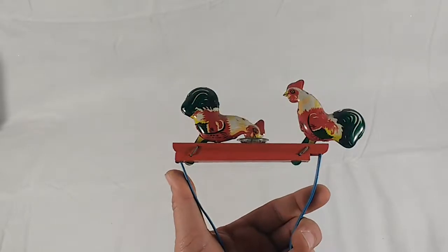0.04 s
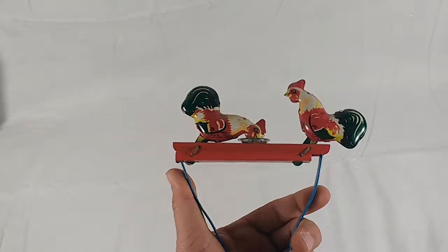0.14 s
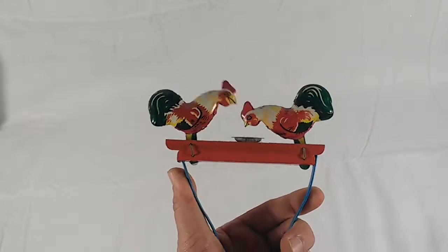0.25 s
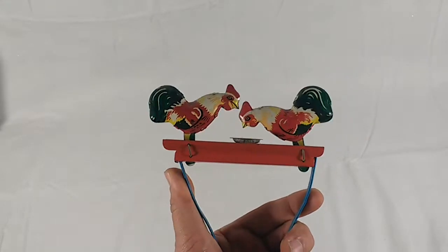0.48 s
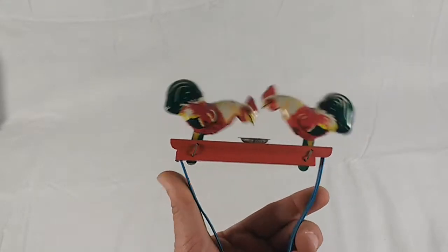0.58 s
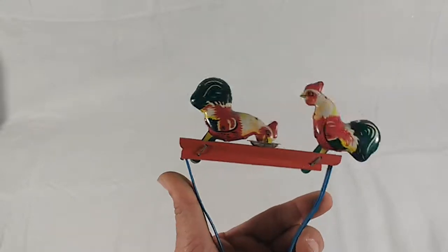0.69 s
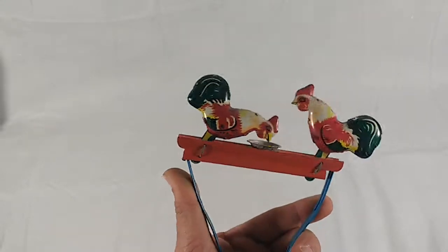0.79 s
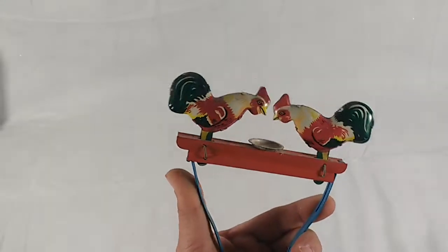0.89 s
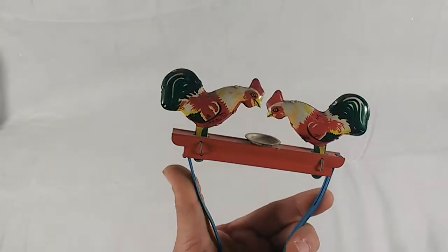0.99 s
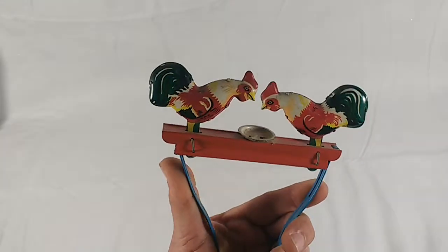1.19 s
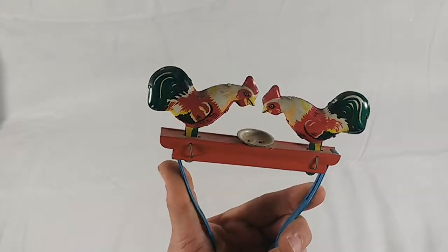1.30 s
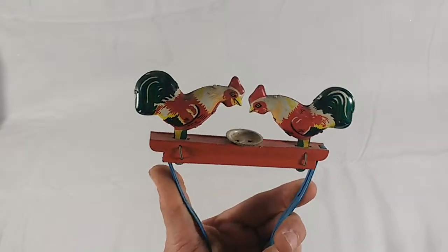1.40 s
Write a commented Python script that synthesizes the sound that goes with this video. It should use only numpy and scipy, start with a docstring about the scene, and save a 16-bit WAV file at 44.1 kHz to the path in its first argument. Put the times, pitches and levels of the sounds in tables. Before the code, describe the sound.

Sharp, dry clicks come from a hand-squeezed tin toy, its hens pecking in turn with a brief thin ring. Two clattering bursts and a smaller tap are heard up close, leaving only a small room's faint hiss and hum.

```python
"""Hiss, rumble and mains hum fill a small quiet room. At 0.12 s the wire linkage of a hand-held toy scrapes
and the squeezing hand rustles. Two tin hens rock on pivots and peck at a dish, each stroke a cluster of
tiny metal contacts that ring the thin pressed sheet: right hen from 0.21 s, left from 0.58 s, right again
at 0.79 s, a last faint tick of the left at 1.26 s. Both hens share one stereo image, the left channel
a late, inverted twin of the right."""
import sys
import numpy as np
from scipy import signal
from scipy.fft import rfft, irfft, next_fast_len
from scipy.io import wavfile
from scipy.ndimage import uniform_filter1d

SR = 44100
rng = np.random.default_rng(int(sys.argv[2]) if len(sys.argv) > 2 else 0)


def dump(signal):
    """Clip the signal to [-1, 1] and save it as 16-bit WAV at the path in sys.argv[1]."""
    limited = np.clip(np.atleast_2d(signal).T, -1, 1)
    pcm = np.round(limited * 32767).astype(np.int16)
    wavfile.write(sys.argv[1], SR, pcm)


N = 63945

# metal contacts (time [s], hen, knock gain [dB], body gain [dB], treble gain [dB])
CONTACTS = [(0.207, "right", -30.5, -37.5, -48), (0.218, "right", -58, -39, -47),
            (0.2236, "right", -19, -29.5, -32), (0.2278, "right", -17, -32.5, -33),
            (0.2333, "right", -32, -34, -33.5), (0.2677, "right", -42, -28, -36),
            (0.2713, "right", -35, -51, -37), (0.2747, "right", -29, -22.5, -17.5),
            (.2808, "right", -15.5, -26.5, -24), (0.2923, "right", -23, -33, -32.5),
            (0.303, "right", -40, -38, -39), (.3200, "right", -46, -45, -53),
            (0.33, "right", -36, -41.5, -56), (0.385, "right", -61, -46.5, -64),
            (0.5791, "left", -48, -52, -89), (0.5872, "left", -32, -29, -33.5),
            (0.5898, "left", -25.5, -35.5, -30), (0.6073, "left", -46, -39.5, -45),
            (0.6164, "left", -35, -45.5, -60), (.6705, "left", -22, -34.5, -25.5),
            (0.6736, "left", -16, -24.5, -26), (0.6817, "left", -23, -27, -37),
            (0.719, "left", -54, -49.5, -68), (0.7857, "left", -58, -45, -53.5),
            (0.7878, "right", -34.5, -35, -47), (.7910, "right", -22.5, -46, -46),
            (0.8006, "right", -50, -43, -57), (1.2608, "left", -58, -54.5, -59.5)]
# ringing modes per hen (frequency [Hz], relative level [dB], t60 [s])
HEN_MODES = {"right": [(1292, -24.5, 0.16), (1441, -14.5, 0.06), (2280, -15.5, 0.09), (2700, -6.5, 0.091),
             (2817, -7.5, 0.049), (3072, -8.5, 0.092), (3235, -17, 0.15), (3804, -9.5, 0.029),
             (4065, -12, 0.064), (4810, -15.5, 0.079), (6000, -21, 0.084), (6590, -16.5, 0.071),
             (7820, -6, 0.022), (8120, -13, 0.055), (10230, -38, 0.044)], "left": [(440, -29.5, 0.049),
             (1131, -21, 0.03), (1301, -16.5, 0.08), (1380, -15.5, .04), (2400, -9, 0.03),
             (2710, -12.5, 0.048), (2888, -5, 0.047), (3130, -20, 0.035), (3640, -6, 0.037),
             (3920, -4.5, 0.044), (4720, -18, 0.042), (6600, -4, 0.046), (9790, -20.5, 0.1),
             (11810, -13, 0.048), (11900, -21, .05)]}
# crowded short-lived sheet modes, body and treble (frequency [Hz], relative density [dB])
BODY_SPECTRUM = [(150, -34), (420, -24), (850, -29), (1200, -15), (1600, -6), (2300, -2), (2850, 1),
                 (3400, -4.5), (4200, -6.5), (5500, -20.5), (16000, -37)]
TREBLE_SPECTRUM = [(300, -57), (1000, -20.5), (2500, -3), (4500, -2), (5400, -7.5), (6500, 2), (8000, -1),
                   (9000, -1), (12300, -5.5), (14000, -5.5), (16000, -18)]
# linkage slides (start [s], length [s], body level [dB], treble level [dB])
SLIDES = [(0.124, 0.21, -72, -79), (0.228, 0.045, -45.5, -57), (0.285, 0.055, -50, -51.5),
          (0.36, 0.073, -64.5, -75), (.578, 0.017, -54, -54), (0.618, 0.11, -57, -61.5),
          (0.663, 0.0065, -47.5, -67), (0.795, 0.14, -65, -71.5)]
# hiss, rumble, hand rustle, room reflections (frequency [Hz], relative density [dB])
HISS_SPECTRUM = [(20, -10), (50, -10), (75, -10.5), (105, 12), (135, 4), (300, -0.5), (600, -6.5),
                 (1200, -9), (2000, -11.5), (3000, -13), (6000, -15.5), (10000, -19), (16000, -21.5)]
RUMBLE_SPECTRUM = [(20, -14), (60, -8), (105, -1), (160, -0.5), (400, -5.5), (900, -8), (2000, -14.5),
                   (4000, -50), (16000, -46)]
HAND_SPECTRUM = [(20, -16), (60, -17), (120, 2), (400, -14), (900, -15.5), (2500, -53), (16000, -57)]
ROOM_SPECTRUM = [(200, 1), (1000, 1.5), (2800, -4.5), (7000, 1.5), (15000, 1.5)]
# mains and machine tones (frequency [Hz], level [dB])
HUM_TONES = [(105, -71), (240, -65), (360, -70.5), (480, -87), (960, -82), (1438, -76)]

HISS_DB, RUMBLE_DB = -63.5, -69
HUM_WAVER_RAD, HUM_WAVER_DEPTH, HUM_SKEW_RAD = 0.2, 0.2, 0.42
GRAIN_DEPTH, GRAIN_RATE_HZ = 0.38, 400
HAND_START_S, HAND_LENGTH_S, HAND_DB = 0.13, 0.19, -60
CONTACT_SAMPLES = 8192
KNOCK_HZ, KNOCK_RISE_S, KNOCK_TRIM_DB = 2857, 0.0011, -3.5
ATTACK_S, CRACK_T60_S, BODY_T60_S, TREBLE_T60_S = 0.0009, 0.0041, 0.04, 0.035
BODY_TRIM_DB, RING_TRIM_DB, RING_SPLIT_HZ = -2, -2, 4300
CHATTER_DEPTH, CHATTER_RATE_HZ = 0.38, 1380
ROOM_DB, ROOM_ONSET_S, ROOM_SPLIT_HZ = -21, 0.0057, 4500
ROOM_LOW_T60_S, ROOM_HIGH_T60_S = 0.68, 0.43
NEAR_DB, NEAR_T60_S, LEFT_LAG_S = -10, 0.023, 0.00056
THRESHOLD_DB, RATIO, RELEASE_S, LOWPASS_HZ = -20.5, 1.71, 0.61, 16000


def undb(db):
    """Decibels to gain."""
    return 10 ** (np.asarray(db) / 20)


def unit(x):
    """Scale to rms 1."""
    return x / np.sqrt(np.mean(x ** 2))


def noise(spectrum, size=N):
    """Noise of rms 1, shaped by (frequency [Hz], relative density [dB]) points."""
    hz, db = np.array(spectrum, float).T
    padded = next_fast_len(size, True)
    bins_hz = np.maximum(np.fft.rfftfreq(padded, 1 / SR), 1)
    shape = undb(np.interp(np.log(bins_hz), np.log(hz), db))
    return unit(irfft(rfft(rng.standard_normal(padded)) * shape, padded)[:size])


def fade(t, t60_s):
    """Exponential decay, 60 dB down at t60_s."""
    return np.exp(-np.log(1000) * t / t60_s)


def since(start_s):
    """Seconds since start_s, zero before."""
    return np.maximum(np.arange(N) / SR - start_s, 0)


def swell(start_s, length_s):
    """Rounded rise and fall."""
    progress = np.minimum(since(start_s) / length_s, 1)
    return np.sqrt(np.abs(np.sin(np.pi * progress)))


def wander(rate_hz, points=4096):
    """Interpolated random motion, spread near 1."""
    return np.interp(since(0) * rate_hz, np.arange(points), rng.standard_normal(points))


def spread(x):
    """Mono to stereo: left late and inverted."""
    size = next_fast_len(N, True)
    delay = np.exp(-2j * np.pi * np.fft.rfftfreq(size, 1 / SR) * LEFT_LAG_S)
    late = irfft(rfft(x, size) * delay, size)[:N]
    return np.array([-late, x])


def room_noise():
    """Steady hiss plus diffuse rumble, the rumble independent per side."""
    hiss = spread(undb(HISS_DB) * noise(HISS_SPECTRUM))
    rumble = undb(RUMBLE_DB) * np.array([noise(RUMBLE_SPECTRUM), noise(RUMBLE_SPECTRUM)])
    return hiss + rumble


def hum():
    """Mains hum and faint machine tones, wavering in phase and level."""
    out, t = 0, since(0)
    for hz, db in HUM_TONES:
        phase = 2 * np.pi * (hz * t + rng.random()) + HUM_WAVER_RAD * wander(rate_hz=19)
        left_phase = phase - 2 * np.pi * hz * LEFT_LAG_S - HUM_SKEW_RAD
        amplitude = np.sqrt(2) * undb(db) * (1 + HUM_WAVER_DEPTH * wander(rate_hz=6.17))
        out = out + amplitude * np.array([-np.sin(left_phase), np.sin(phase)])
    return out


def linkage_scrape():
    """Wire linkage rubs the tin with a fine uneven grain."""
    grain = unit(np.exp(GRAIN_DEPTH * wander(GRAIN_RATE_HZ)))
    body, treble = noise(BODY_SPECTRUM), noise(TREBLE_SPECTRUM)
    out = 0
    for start_s, length_s, body_db, treble_db in SLIDES:
        out = out + swell(start_s, length_s) * (undb(body_db) * body + undb(treble_db) * treble)
    return grain * out


def hand_rustle():
    """Dull rustle of fingers squeezing the wire."""
    return undb(HAND_DB) * noise(HAND_SPECTRUM) * swell(HAND_START_S, HAND_LENGTH_S)


def contact(hen, knock_db, body_db, treble_db):
    """One touch: knock of the damped main flexure, bright crack, crowded sheet modes, the hen's ring."""
    t = np.arange(CONTACT_SAMPLES) / SR
    rise = t / KNOCK_RISE_S
    pulse = rise ** 2 * np.exp(2 * (1 - rise))
    knock = undb(KNOCK_TRIM_DB + knock_db) * pulse * np.sin(2 * np.pi * KNOCK_HZ * t)
    micro_bounces = wander(CHATTER_RATE_HZ, points=512)[:CONTACT_SAMPLES]
    chatter = unit(np.exp(CHATTER_DEPTH * micro_bounces))
    body = undb(BODY_TRIM_DB + body_db) * noise(BODY_SPECTRUM, CONTACT_SAMPLES) * fade(t, BODY_T60_S)
    splash = undb(treble_db) * noise(TREBLE_SPECTRUM, CONTACT_SAMPLES)
    treble = chatter * splash * fade(t, TREBLE_T60_S)
    crack = splash * fade(t, CRACK_T60_S)
    ring = 0
    for hz, mode_db, t60_s in HEN_MODES[hen]:
        drive_db = body_db if hz < RING_SPLIT_HZ else treble_db
        envelope = undb(RING_TRIM_DB + mode_db + drive_db) * fade(t, t60_s)
        ring = ring + envelope * np.sin(2 * np.pi * (hz * t + rng.random()))
    attack = 1 - np.exp(-t / ATTACK_S)
    return knock + attack * (crack + body + treble + ring)


def pecks():
    """Hens strike the dish in clusters of contacts."""
    out = np.zeros(N + CONTACT_SAMPLES)
    for time_s, hen, *gains_db in CONTACTS:
        i = int(time_s * SR)
        out[i:i + CONTACT_SAMPLES] += contact(hen, *gains_db)
    return out[:N]


def room_reverb(x):
    """Diffuse reflections; treble dies sooner."""
    t, wash = since(0), noise(ROOM_SPECTRUM)
    low = signal.sosfilt(signal.butter(2, ROOM_SPLIT_HZ, fs=SR, output="sos"), wash)
    high = signal.sosfilt(signal.butter(2, ROOM_SPLIT_HZ, "high", fs=SR, output="sos"), wash)
    onset = 1 - np.exp(-t / ROOM_ONSET_S)
    tail = onset * (low * fade(t, ROOM_LOW_T60_S) - high * fade(t, ROOM_HIGH_T60_S))
    return undb(ROOM_DB) * signal.fftconvolve(x, tail / np.linalg.norm(tail))[:N]


def near_reflections(stereo):
    """Faint short smear, independent per side."""
    t = np.arange(CONTACT_SAMPLES) / SR
    smears = rng.standard_normal((2, len(t))) * fade(t, NEAR_T60_S)
    sides = [signal.fftconvolve(x, h / np.linalg.norm(h))[:N] for x, h in zip(stereo, smears)]
    return undb(NEAR_DB) * np.array(sides)


def scene():
    """Toy, hand and reflections over room noise and hum."""
    toy = pecks() + linkage_scrape() + hand_rustle()
    stereo = spread(toy + room_reverb(toy))
    return stereo + near_reflections(stereo) + room_noise() + hum()


def record(dry):
    """Compressor ducks at loud contacts and recovers slowly; steep low-pass follows."""
    release = np.exp(-since(0) / RELEASE_S)
    held_peak = release * np.maximum.accumulate(np.abs(dry).max(axis=0) / release)
    gain = np.minimum(undb(THRESHOLD_DB) / (held_peak + 1e-9), 1) ** (1 - 1 / RATIO)
    ducked = dry * uniform_filter1d(gain, size=128)
    lowpass = signal.ellip(8, rp=0.2, rs=70, Wn=LOWPASS_HZ, fs=SR, output="sos")
    return signal.sosfilt(lowpass, ducked)


dry = scene()
out = record(dry)
dump(out)
```